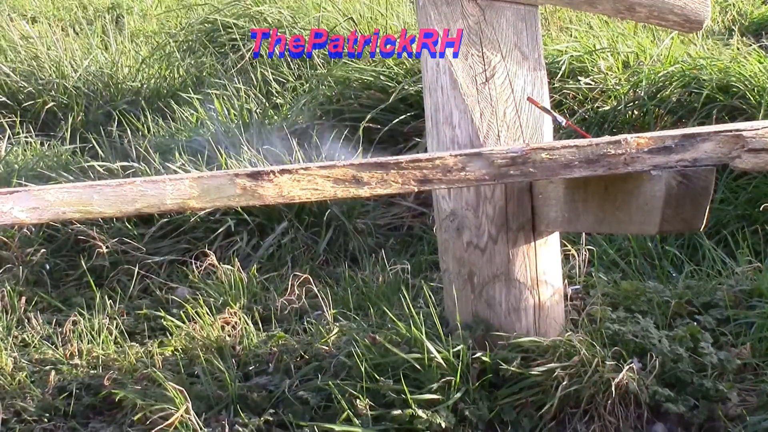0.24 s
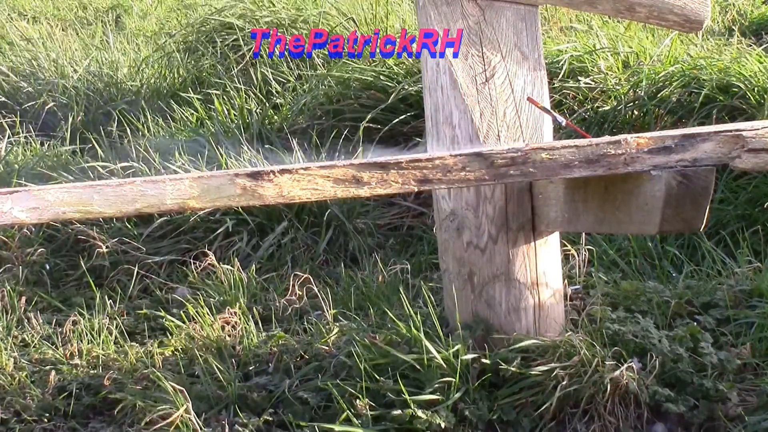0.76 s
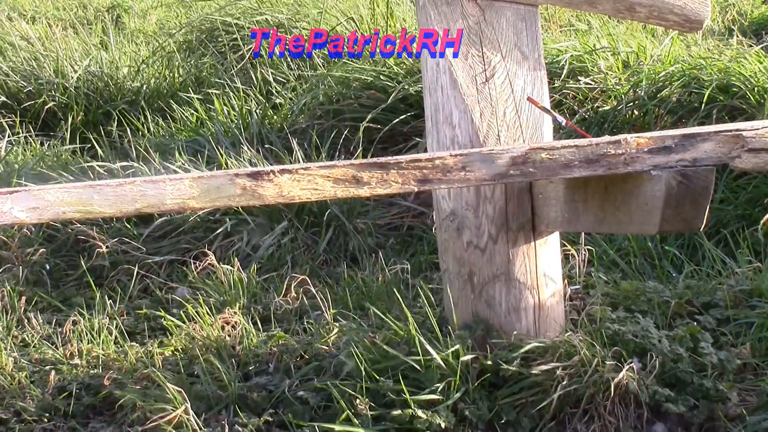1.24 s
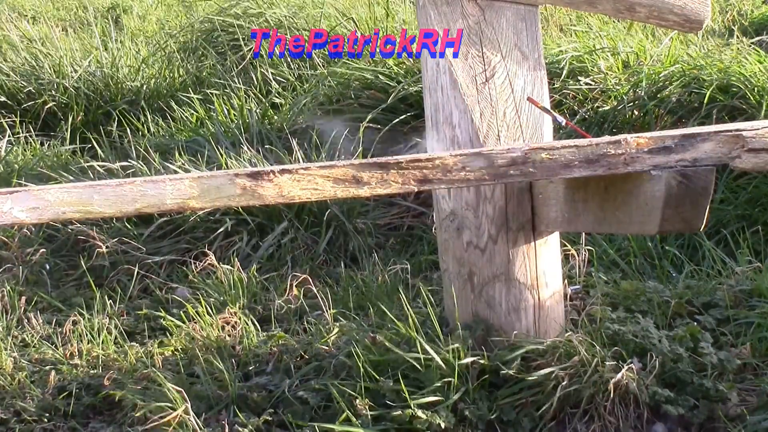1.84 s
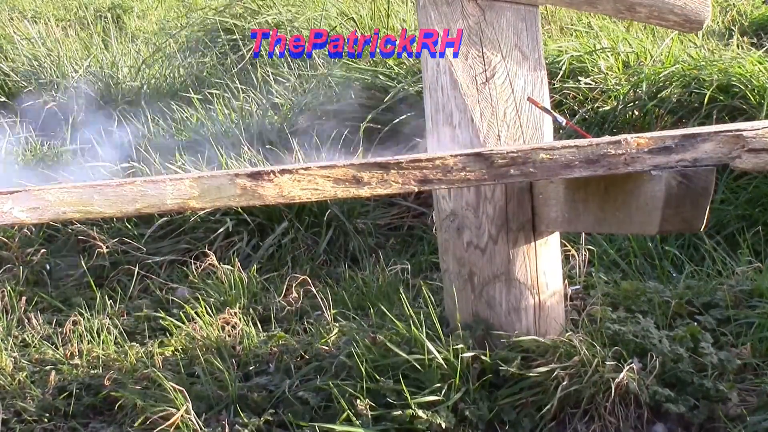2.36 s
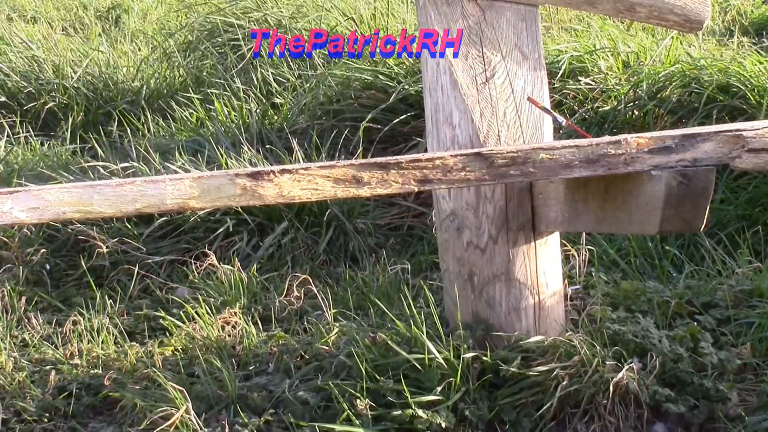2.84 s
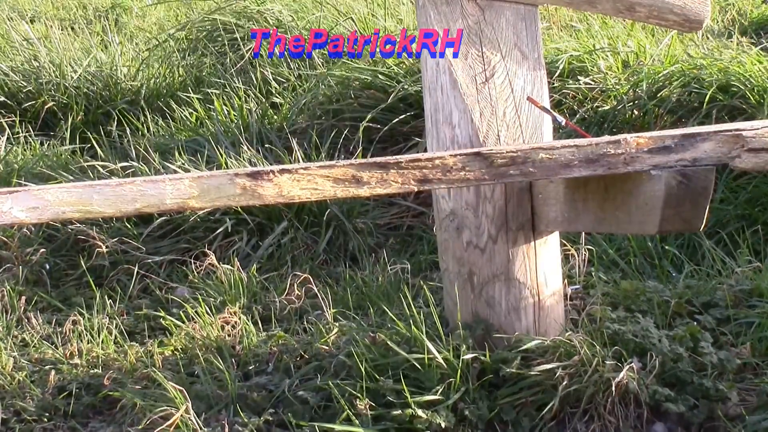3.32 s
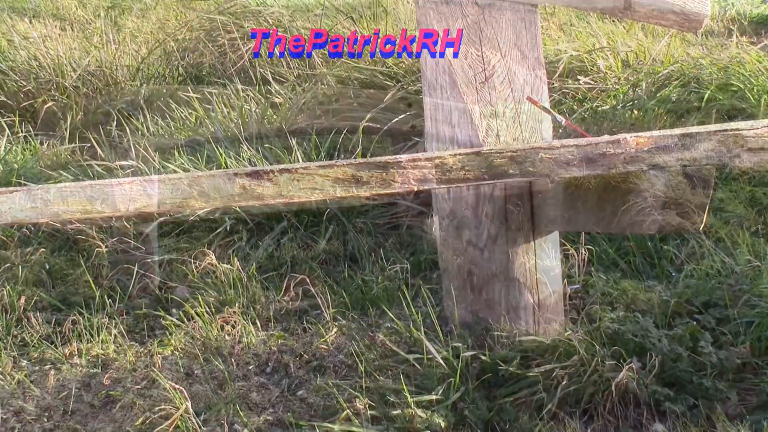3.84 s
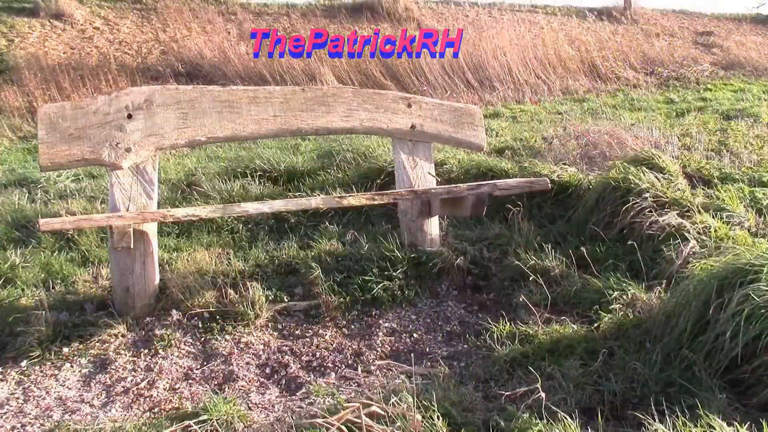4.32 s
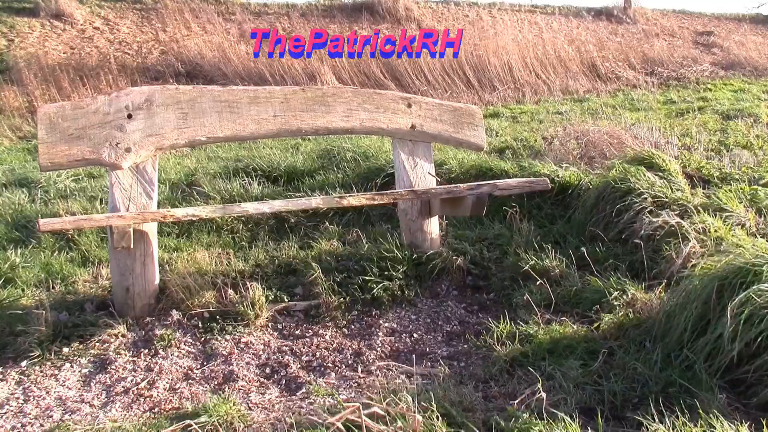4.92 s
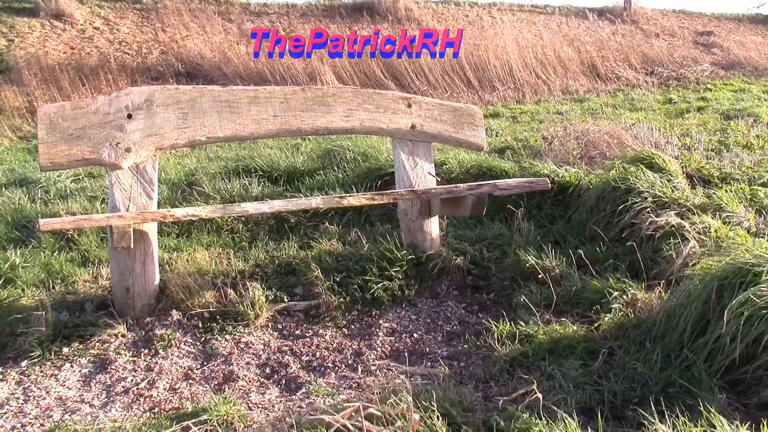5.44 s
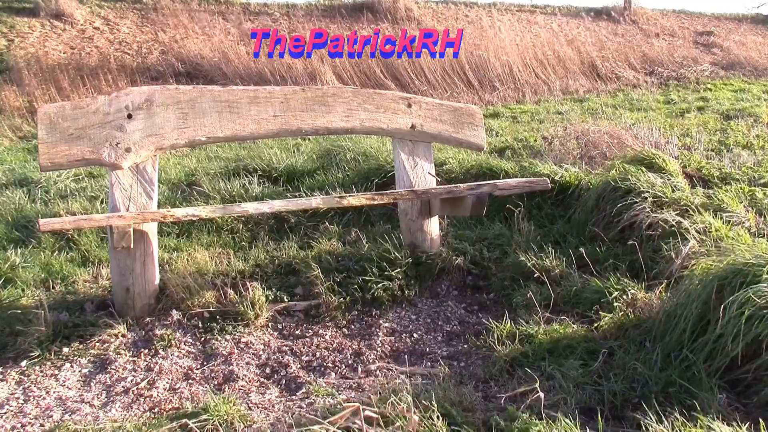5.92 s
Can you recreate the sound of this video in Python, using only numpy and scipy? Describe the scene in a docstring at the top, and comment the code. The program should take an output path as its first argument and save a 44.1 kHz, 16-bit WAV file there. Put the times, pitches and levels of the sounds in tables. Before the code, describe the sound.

Low, uneven wind buffeting dominates, with sudden slaps and brief lulls, and beneath it the crisp hiss of a burning fuse and small crackles. A few metres away the firecracker explodes in a single hard, overloaded crack that dies fast into the open field. A quiet moment follows, with faint fluttering wind, before the gusts return strongly with a light dry rustle and cut off.

```python
"""A firecracker fizzes on a wooden rail in a meadow and goes off, a few metres from a camcorder.
Gusty wind, noise in five layers of eddy size, buffets the two microphone ports throughout; it is
heard faintly after the bang and swells back. The fuse and the rustling grass are grainy hiss, sparks
and dry stalks tick in short cracks, and the bang is a set of shock fronts with scattered noise."""
import sys
import numpy as np
from scipy import signal
from scipy.fft import rfft, irfft
from scipy.io import wavfile
from scipy.ndimage import uniform_filter1d

SR = 44100
rng = np.random.default_rng(int(sys.argv[2]) if len(sys.argv) > 2 else 0)


def transcribe(u):
    """Save the signal u as a 16-bit wav file named by the first command-line argument.

    u: samples, shape (n,) or (channels, n), limited to [-1, 1]; the rate is SR.
    q: integer samples, one column per channel.
    """
    v = np.clip(np.atleast_2d(u).T, -1, 1)
    q = np.round(v * 32767).astype(np.int16)
    wavfile.write(sys.argv[1], SR, q)


N = 272538
T = np.arange(N) / SR  # seconds
F = np.maximum(np.arange(N // 2 + 1) * SR / N, 1.)  # Hz of each frequency bin
BANG_S = 2.4138

# How far the two ports disagree on sounds from the meadow. Each row: frequency in Hz, side gain in dB.
MEADOW_SIDE = [(1500, -17), (4400, -16.5), (8000, 1), (15000, 8)]


def undb(db):
    """Gain of a level in dB."""
    return 10 ** (np.asarray(db) / 20)


def shape(points):
    """Gain per frequency bin from (Hz, dB) points."""
    hz, db = np.transpose(points)
    return undb(np.interp(np.log(F), np.log(hz), db))


def curve(rows):
    """Columns of a table of (s, value, ..) rows, sample by sample."""
    s, *columns = np.transpose(rows)
    return [np.interp(T, s, column) for column in columns]


def walk(rate):
    """Random levels held 1 / rate seconds and slewed twice; spread 1."""
    hold = int(SR / rate)
    levels = np.repeat(rng.standard_normal(N // hold + 1), hold)
    levels = uniform_filter1d(uniform_filter1d(levels, hold), hold)[:N]
    return levels / levels.std()


def unit(spec, lo_hz, hi_hz):
    """Scale that gives the band lo-hi of a spectrum an rms of 1."""
    inside = (F > lo_hz) & (F < hi_hz)
    return N / np.sqrt(2 * np.sum(np.abs(spec[inside]) ** 2))


def band(x, hz, width_hz):
    """Four-pole band-pass."""
    hi = min(np.sqrt(hz ** 2 + width_hz ** 2 / 4) + width_hz / 2, .45 * SR)
    sos = signal.butter(2, [hz ** 2 / hi, hi], "bandpass", fs=SR, output="sos")
    return signal.sosfilt(sos, x, axis=-1)


def stereo(mid, side):
    """Left and right from what the ports share and how they differ."""
    return np.array([mid + side, mid - side])


def gusts():
    """Heard level and sharpness of the wind; each lull sinks in and ends quickly, each surge is brief."""
    # Wind as heard, faint after the bang and swelling back. Each row: time in seconds, rumble in dB,
    # sharpness in dB (how far the treble edge stands above the usual colour), before lulls and surges.
    wind_rows = [(0.0, -20.5, -9), (.09, -3.5, 7.5), (.2, -11, 2), (.33, -11, 10), (.38, -17, -0.5),
                 (.53, -17, 1), (.68, -9.5, 14), (.82, -8.5, 1), (.9, -9, 7.5), (1.02, -11, 7),
                 (1.15, -10, 10.5), (1.26, -12, -6.5), (1.34, -12.5, 0), (1.47, -9, 3.5),
                 (1.61, -14.5, 1.5), (1.69, -16, -20), (1.78, -20.5, -10), (1.9, -22, -15.5),
                 (2.05, -17.5, -5.5), (2.21, -12.5, -7), (2.28, -10.5, -25), (2.38, -18.5, -32),
                 (2.44, -40, 7), (2.5, -46.5, 6), (2.56, -34.5, -6), (2.7, -41, -3), (2.82, -36, -3),
                 (2.93, -25, 10.5), (3.06, -31.5, -0.5), (3.23, -23.5, 4), (3.4, -29, 2.5),
                 (3.55, -27.5, 4.5), (3.68, -25.5, 6), (3.8, -27, 3.5), (3.88, -26.5, 8.5),
                 (4.05, -24.5, 7.5), (4.23, -22.5, 7.5), (4.3, -15.5, 4.5), (4.45, -16.5, 2.5),
                 (4.62, -17, 3.5), (4.75, -13.5, 8), (4.815, -16, 6), (4.86, -15, 9.5), (4.96, -14.5, 2.5),
                 (5.13, -11.5, 1.5), (5.28, -11.5, 2), (5.46, -12.5, -1), (5.6, -15.5, -1.5),
                 (5.69, -11, -5), (5.77, -17.5, -6), (5.83, -13.5, -9), (6.0, -15, -7), (6.08, -25.5, -17),
                 (6.13, -34, -19), (6.18, -36, -34)]
    # Lulls, where the flow lets go of the ports. Each row: deepest point in seconds, onset length in
    # seconds, rumble drop in dB, further treble drop in dB (negative: a rise).
    lull_rows = [(0.069, 0.017, 13.5, 4), (0.373, 0.011, 8, 8), (0.415, 0.014, 22, 4),
                 (0.463, 0.011, 10.5, -6), (.512, .015, 5, 4), (0.614, 0.025, 0, 3.5),
                 (0.969, 0.041, 5, -1), (1.422, 0.0092, 8, -1), (1.765, 0.13, 12, 11),
                 (1.978, 0.078, 19, 10), (2.098, 0.027, 4.5, 5), (2.142, 0.013, 10, 23),
                 (2.253, 0.023, 31, -6), (2.399, 0.018, 20, -8), (2.72, 0.069, -0.5, 17),
                 (2.767, 0.029, 8, 1), (2.855, 0.046, 6.5, 22), (3.008, 0.078, 2.5, 6.5),
                 (3.107, 0.041, 11, 8.5), (3.298, 0.052, 1.5, 16.5), (3.439, 0.028, 1, 10),
                 (3.648, 0.013, 0.5, 20), (3.726, 0.038, 8, 15), (3.786, 0.078, -2, 11),
                 (3.906, 0.0084, -7, 31), (4.66, 0.1, 6, 9.5), (4.795, 0.097, 7.5, 9.5),
                 (4.971, 0.077, 1, 7), (5.359, 0.033, 17.5, 10.5), (5.435, 0.04, 5, 5.5),
                 (5.545, 0.097, 10.5, 14.5), (5.736, 0.021, 10.5, 8.5), (5.919, 0.057, 7, -3.5),
                 (5.973, 0.01, 0.5, 15)]
    # Brief surges of the flow. Each row: peak in seconds, rise and fall each in seconds, rumble rise
    # in dB, further treble rise in dB (negative: a drop).
    surge_rows = [(0.574, 0.013, 9.5, -3.5), (.655, 0.029, 0, 0.5), (0.762, 0.0089, -0.5, 5.5),
                  (0.899, 0.027, 4, 1), (1.271, 0.021, 1.5, 11), (1.4, 0.025, 4, 1.5),
                  (1.485, 0.023, -2, 8.5), (1.812, 0.013, -1, 16.5), (2.04, 0.032, 6.5, -11),
                  (2.12, 0.015, 6, -2.5), (2.205, .015, -1.5, 7), (2.785, 0.01, 0, 6.5),
                  (3.014, 0.0061, -1.5, 12), (2.879, 0.0053, -0.5, 6), (2.957, 0.0046, 0.5, 7),
                  (3.185, 0.017, 2, 4.5), (3.236, 0.02, 3, 7), (3.333, .015, -1.5, 5.5),
                  (3.39, 0.028, -0.5, 8), (3.501, 0.028, 5, 4), (3.595, 0.027, 4.5, 5.5),
                  (3.737, 0.0061, 2.5, 9), (3.812, .015, 3, 5.5), (3.888, 0.013, 1.5, 7),
                  (3.95, 0.044, 5.5, 2), (4.045, 0.017, -3.5, 7.5), (4.14, 0.008, -5, 3),
                  (4.37, 0.027, 1, 3.5), (4.525, 0.034, 1, 4.5), (4.599, 0.022, 5.5, 3),
                  (4.862, 0.049, 0.5, 2.5), (4.906, 0.03, 3.5, 1), (5.055, 0.014, -2.5, 3),
                  (5.168, 0.019, -4.5, 4), (5.27, 0.027, 2.5, -0.5), (5.29, 0.018, 4.5, 1),
                  (5.318, 0.018, 1, 2), (5.46, 0.012, 5.5, -1), (5.208, 0.017, -2, 3.5),
                  (5.565, 0.019, 1.5, 7.5), (5.65, 0.017, 1, 7.5), (5.677, 0.01, 3.5, 3.5),
                  (5.71, 0.014, -1, -1), (5.825, 0.028, 4, -4), (5.87, 0.024, 2.5, 6.5),
                  (5.955, 0.013, 2.5, 4), (5.993, 0.0066, -2, 15), (6.035, 0.017, 4, 4),
                  (6.074, 0.0089, 7, 6), (6.125, 0.014, 3, 5)]
    return_s = 0.015  # the flow grips again this soon after the deepest point
    rumble_db, sharp_db = curve(wind_rows)
    for s, length, drop_db, dull_db in lull_rows:
        depth = np.minimum(1 + (T - s) / length, 1 - (T - s) / return_s)
        depth = np.clip(depth, 0, 1) ** 0.89
        rumble_db = rumble_db - drop_db * depth
        sharp_db = sharp_db - dull_db * depth
    for s, length, rise_db, bright_db in surge_rows:
        height = np.clip(1 - np.abs(T - s) / length, 0, 1)
        rumble_db = rumble_db + rise_db * height
        sharp_db = sharp_db + bright_db * height
    return rumble_db, sharp_db


def slaps():
    """Strength of the turbulence (a steep front at each slap, then a short wake) and each first push."""
    # Sudden slaps of air. Each row: time in seconds, strength in dB added to a steady buffeting of 0 dB.
    slap_rows = [(.02, 9), (0.042, 9), (0.08, 7), (.176, 5), (.198, 10), (.281, 8), (.339, 10.5), (.432, 7),
                 (.567, 7.5), (0.613, 8), (.747, 7), (.999, 4), (1.022, 8), (1.388, 11), (1.436, 8.5),
                 (1.456, 7), (1.543, 8.5), (1.779, 9), (1.812, 13.5), (1.885, 6.5), (2.007, 9),
                 (2.068, 8.5), (2.11, 13.5), (2.258, 9.5), (2.373, 9), (2.782, 15.5), (2.876, 13),
                 (3.015, 10.5), (3.331, 7), (3.389, 7), (3.656, 9), (3.874, 10), (4.519, 10), (4.677, 11.5),
                 (4.798, 9), (4.865, 7.5), (4.992, 10), (5.041, 7.5), (5.056, 12), (5.166, 6.5), (5.261, 7),
                 (5.379, 8), (5.557, 16.5), (5.604, 7.5), (5.755, 5.5), (5.99, 7), (6.034, 10)]
    wake_s, push = 0.0039, 1.6  # the push is set against noise of rms 1
    fronts = np.zeros(N)
    for s, db in slap_rows:
        fronts[int(s * SR)] = undb(db)
    wake = signal.lfilter([1], [1, -np.exp(-1 / (wake_s * SR))], fronts)
    kick = uniform_filter1d(-push * (fronts > 0), size=11) * 11  # 11 samples long
    return 1 + wake, kick


def wind():
    """Eddies of uneven size burst on the ports; small eddies come in sharper bunches than large ones."""
    # Usual colour of the buffeting. Each row: frequency in Hz, density in dB per Hz.
    wind_colour = [(15, -60), (25, -29), (137, -2.5), (208, 0), (253, -1), (293, -1.5), (385, -3.5),
                   (517, -6.5), (748, -13.5), (1420, -27.5), (2050, -35), (5640, -65), (9000, -83.5),
                   (11700, -106), (19800, -120)]
    # How much the two ports differ in wind. Each row: frequency in Hz, side gain in dB.
    port_side = [(60, -47.5), (110, -59), (200, -68), (380, -43), (700, -27), (1290, -15), (2380, -8),
                 (4400, -2), (8120, -1.5), (15000, 9)]
    rumble_db, edge_db = gusts()
    # the middle register follows a share of the sharpness, above and below the usual
    mid_db = np.where(edge_db > 0, 0.37, 0.41) * edge_db
    # the largest eddies follow the gusts sluggishly
    lag_db = uniform_filter1d(rumble_db, int(.12 * SR)) - rumble_db
    # the deep bass rises less than the gust and gains when the wind is dull
    bass_db = lag_db - 0.13 * rumble_db - 0.39 * edge_db
    slap, kick = slaps()
    noise = rng.standard_normal((2, N))  # mid and side
    bunch, burst = walk(40), np.minimum(walk(700), 1.6)
    colour = shape(wind_colour) * np.array([np.ones(len(F)), shape(port_side)])

    # five layers, from the largest eddies to the smallest
    centres = np.log2([70, 280, 850, 2300, 4600])  # Hz, as octaves
    spikes_db = [.1, 1.8, 3.8, 5.0, 6.5]
    slap_shares = [0.29, 0.25, 0.21, 0.74, 0.6]  # exponents on the slap strength
    layers_db = [bass_db - 2.0,
                 0.84 * bunch + 0.1,
                 0.29 * bunch + mid_db - 0.55,
                 0.51 * bunch + edge_db - 2.0,
                 .7 * bunch + 1.63 * edge_db - 10.0]
    out = 0
    for spike_db, share, db, row in zip(spikes_db, slap_shares, layers_db, np.eye(5)):
        eddies = (noise * undb(spike_db * burst) + kick) * slap ** share
        crossfade = np.interp(np.log2(F), centres, row)
        layer = irfft(rfft(eddies / eddies.std()) * colour * crossfade, N)
        out = out + undb(db) * layer
    scale = unit(colour[0], 130, 500) / np.sqrt(N)
    out = stereo(*(out * undb(rumble_db - 1.0) * scale))
    # the capsules round off the strongest pushes
    return 1.029 * np.tanh(out)


def hiss(level_db, colour, lo_hz, hi_hz, grain_db):
    """Grainy hiss whose band lo-hi follows a level curve; the ports disagree in the treble."""
    grains = rng.standard_normal((2, N)) * undb(grain_db * walk(400))
    spec = rfft(grains) * shape(colour)
    spec = spec * unit(spec[0], lo_hz, hi_hz)
    spec[1] *= shape(MEADOW_SIDE)
    return stereo(*(irfft(spec, N) * undb(level_db)))


def spurts():
    """Level of the fuse in dB: each spurt rises, holds and dies back to a smoulder."""
    # Spurts of the fuse. Each row: start of the hold in seconds, its length in seconds, level in dB.
    spurt_rows = [(.03, 0.087, -41.5), (0.218, 0.038, -51), (0.406, .04, -55), (0.486, 0.043, -51),
                  (0.725, 0.062, -60.5), (0.886, 0.16, -55), (1.077, 0.064, -51), (1.39, 0.092, -52.5),
                  (1.57, 0.19, -58), (1.867, 0.08, -58.5), (2.062, 0.037, -56.5), (2.212, 0.025, -54.5),
                  (2.28, 0.08, -62.5)]
    rise_db_s, fall_db_s, smoulder_db = 217, 130.5, -71.5  # dB per second, dB per second, dB
    power = undb(smoulder_db) ** 2
    for s, length, db in spurt_rows:
        fade_db = rise_db_s * np.maximum(s - T, 0) + fall_db_s * np.maximum(T - s - length, 0)
        power = power + undb(db - fade_db) ** 2
    return 10 * np.log10(power)


def fuse():
    """The fuse burns in spurts of grainy hiss until the bang."""
    # Colour of the fizz. Each row: frequency in Hz, density in dB per Hz.
    fizz_colour = [(700, -9.5), (1500, -4), (3000, -4), (4700, -9), (6000, -3), (7700, -4), (8800, -5.5),
                   (10500, -4.5), (13000, -9), (15800, -16)]
    return hiss(spurts(), fizz_colour, 7800, 17000, grain_db=1.5) * (T < BANG_S)


def ticks():
    """Sparks and dry stalks tick: cracks of an impulse and noise that die within milliseconds."""
    # Each row: time in seconds, peak in dB ahead of the recorder, centre in Hz, width in Hz.
    tick_rows = [(.804, -34, 6000, 5000), (1.6694, -33, 8000, 8000), (1.71, -37, 4000, 2500),
                 (1.738, -17, 1900, 5900), (1.7455, -30, 6000, 6000), (1.897, -23, 7000, 8000),
                 (1.96, -39, 2500, 3000), (1.968, -35, 1500, 2500), (1.9752, -31, 3000, 6000),
                 (2.021, -33.5, 1800, 3500), (2.3161, -38, 5500, 4000), (3.014, -43, 2000, 2000),
                 (3.025, -44, 8000, 9000), (3.202, -54, 9000, 9000), (3.332, -48, 3200, 2000),
                 (3.439, -56, 8000, 10000), (3.872, -47, 4500, 4000), (4.047, -53, 5000, 4000),
                 (5.0424, -41, 4500, 3000), (5.553, -51.5, 7000, 5980)]
    size, decay_s = 512, 0.0023
    t = T[:size]
    chance = rng.standard_normal((len(tick_rows), 2, size))
    out = np.zeros((2, N + size))
    for (s, db, hz, width_hz), noise in zip(tick_rows, chance):
        snap = stereo(noise[0], .5 * noise[1]) + 10.0 * (t == 0)
        crack = band(snap * np.exp(-t / decay_s), hz, width_hz)
        start = int(s * SR)
        out[:, start:start + size] += undb(db) * crack / np.abs(crack).max()
    return out[:, :N]


def bang():
    """Shock fronts with their suction phase, then sound scattered back from near and far."""
    # Paths of the shock, inverted by the microphone. Each row: delay in seconds, strength in dB,
    # rise in seconds, length of the push in seconds.
    path_rows = [(0, 29, .00002, 0.00025), (.0005, 28, .00003, 0.00066), (.0023, 10, .00005, .00012),
                 (.0033, 4, .0003, 0.0039)]
    # Scatter from rail, ground and banks. Each row: start after the bang in seconds, time to fall
    # by 60 dB in seconds, gain in dB on band-passed noise, centre in Hz, width in Hz.
    scatter_rows = [(0, 0.032, 1.5, 2600, 2600), (0, 0.033, -10.5, 8120, 5000), (0, .03, -12.5, 5410, 1500),
                    (.04, .03, -32, 2490, 4040), (.003, 0.15, -32, 9000, 11000),
                    (.005, 0.08, -13.5, 1105, 900), (0.012, 0.025, -11, 3114, 1500),
                    (0.017, 0.028, -23, 2756, 2460), (.02, 0.42, -40, 5030, 3960),
                    (.025, 0.14, -32.5, 1493, 2500), (.02, 0.51, -34, 2380, 2600),
                    (.09, .05, -32, 1500, 1200), (.11, .1, -48, 2800, 3000), (.165, 0.2, -38, 2900, 1000),
                    (.2, 0.079, -39, 3000, 2200), (0.24, 0.22, -49, 2500, 2800),
                    (.325, .06, -54, 3000, 2500)]
    # Left port against right. Each row: frequency in Hz, difference in dB.
    left_db = [(100, -2.1), (2000, -1.5), (4000, -1.5), (8000, -2.5), (13000, -2)]
    out = np.zeros((2, N))
    for delay, db, rise, push in path_rows:
        t = np.maximum(T - BANG_S - delay, 0)
        out -= undb(db) * np.minimum(t / rise, 1) * (1 - t / push) * np.exp(-1.4 * t / push)
    # distant ground scatters in patches
    patchy_db = 2.6 * walk(110) * np.clip((T - BANG_S) / .04, 0, 1)
    for start, t60, db, hz, width_hz in scatter_rows:
        t = T - BANG_S - start
        mid, side = band(rng.standard_normal((2, N)), hz, width_hz)
        side = irfft(rfft(side) * shape(MEADOW_SIDE), N)
        fall = undb(db + patchy_db - 60 * np.abs(t) / t60)
        swell = np.clip(t / (.08 * start + .0003), 0, 1)  # later echoes swell in more slowly
        out += fall * swell * stereo(mid, .5 * side)
    # half of the difference goes to each port
    return irfft(rfft(out) * shape(left_db) ** np.array([[.5], [-.5]]), N)


def grass():
    """Grass rustles after the bang, a grainy treble hiss."""
    # Rustle. Each row: time in seconds, level in dB.
    rustle_rows = [(2.4, -82), (3.2, -83), (3.55, -81.5), (3.62, -65.5), (3.69, -79.5), (4.3, -80.5),
                   (4.8, -73), (5.4, -72), (5.52, -69.5), (5.6, -72.5), (5.72, -69.5), (6.18, -69)]
    # Colour of the rustle. Each row: frequency in Hz, density in dB per Hz.
    rustle_colour = [(2000, -3), (4000, -3), (8000, -1.5), (12000, -4), (15800, -14)]
    level_db = curve(rustle_rows)[0]
    return hiss(level_db, rustle_colour, 6500, 13000, grain_db=1.5) * (T > BANG_S)


def scene():
    """The fuse burns in the wind until the bang; grass rustles in the gusts after it."""
    return wind() + fuse() + ticks() + bang() + grass()


def record(dry):
    """The input clips near full scale; the deepest bass and the treble droop, and the top is cut."""
    clipped = np.clip(dry, -.97, .97)
    drooped = signal.lfilter([.76], [1, -.24], clipped)
    bass_cut = signal.butter(1, 28, "highpass", fs=SR, output="sos")
    top_cut = signal.ellip(8, .2, 60, 15750, fs=SR, output="sos")  # low-pass, edge in Hz
    return signal.sosfilt(top_cut, signal.sosfilt(bass_cut, drooped))


dry = scene()
out = record(dry)
transcribe(out)
```